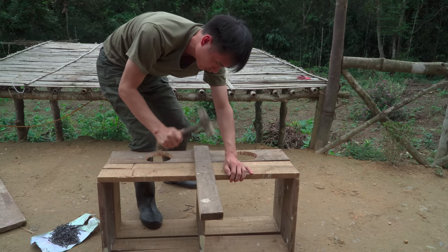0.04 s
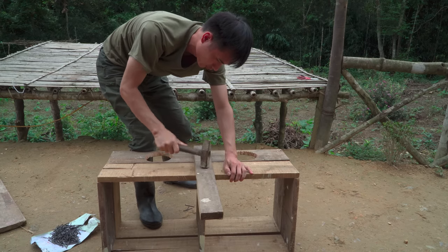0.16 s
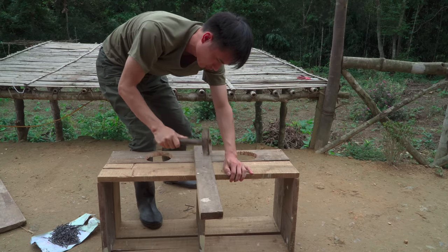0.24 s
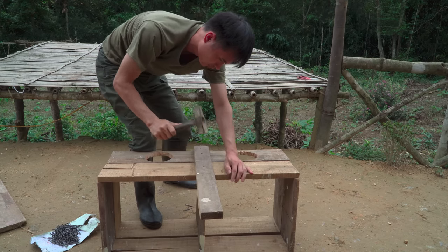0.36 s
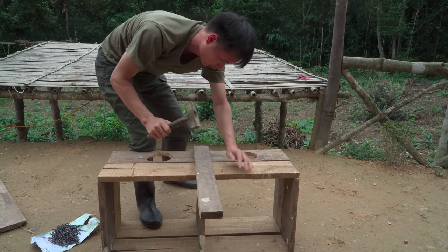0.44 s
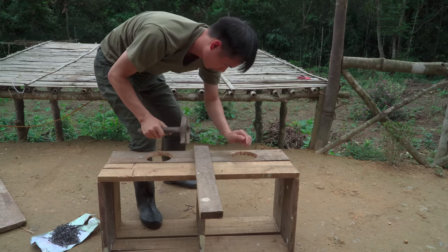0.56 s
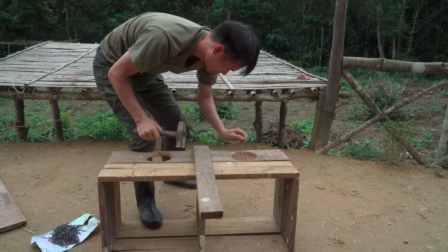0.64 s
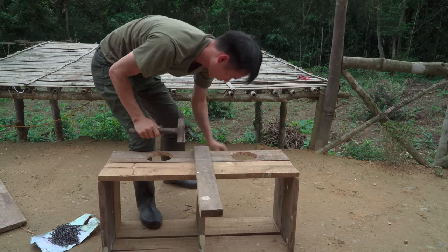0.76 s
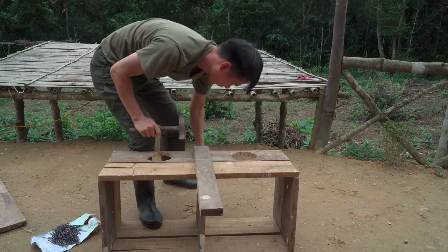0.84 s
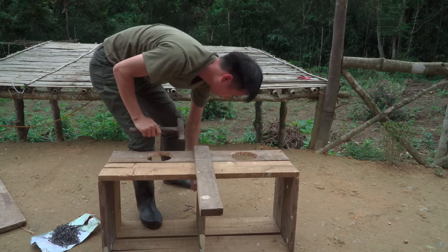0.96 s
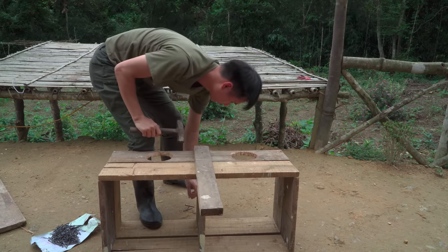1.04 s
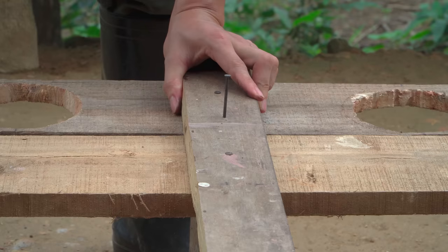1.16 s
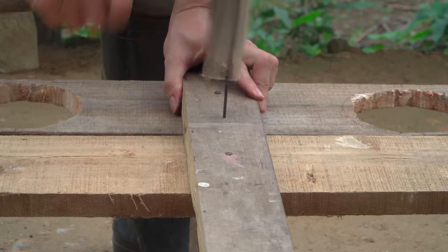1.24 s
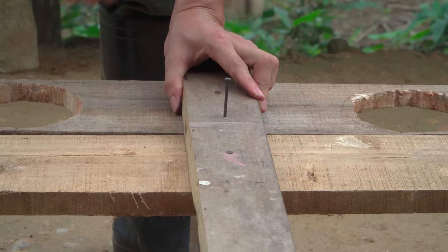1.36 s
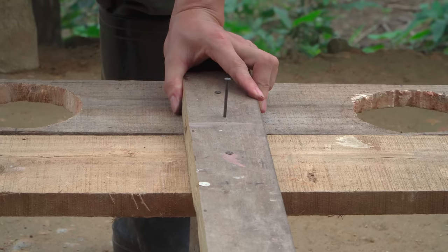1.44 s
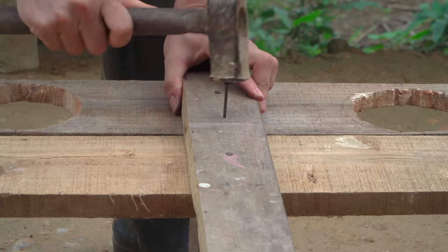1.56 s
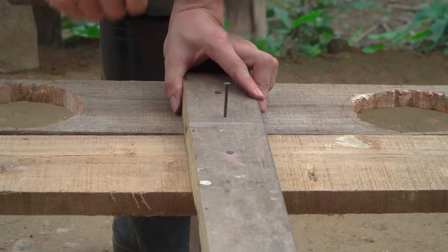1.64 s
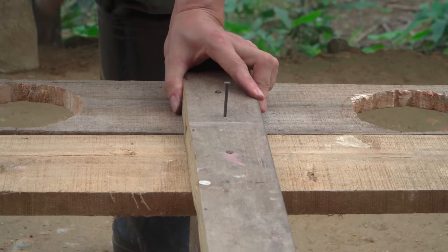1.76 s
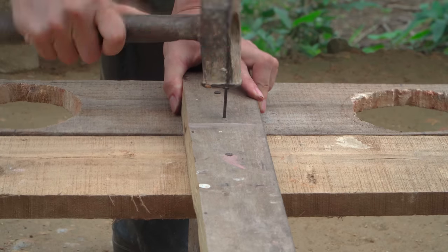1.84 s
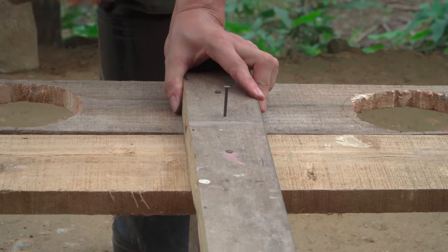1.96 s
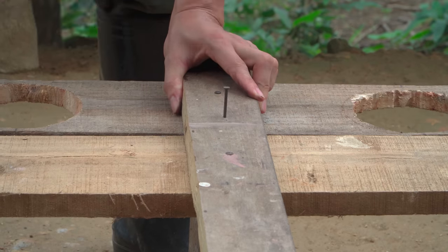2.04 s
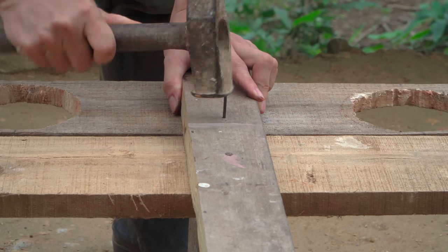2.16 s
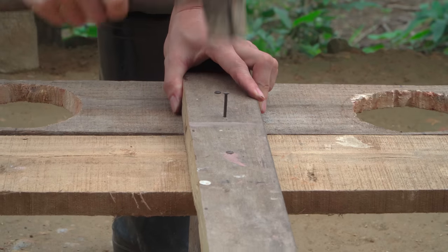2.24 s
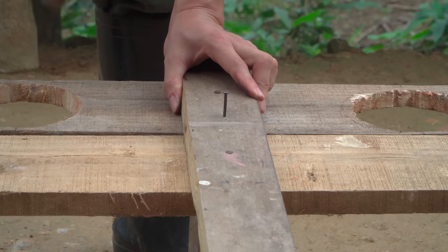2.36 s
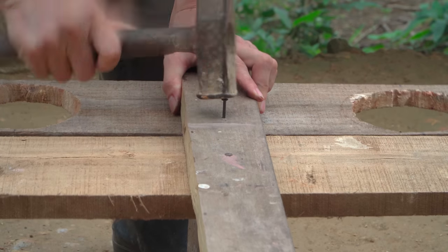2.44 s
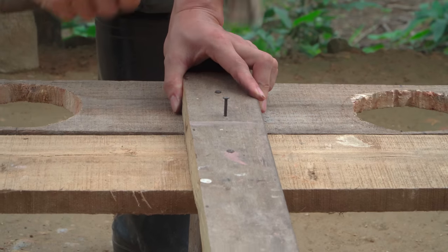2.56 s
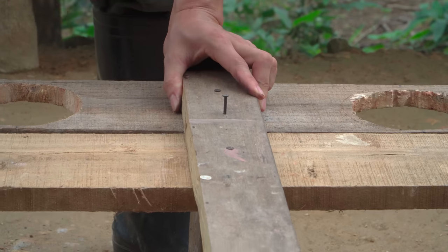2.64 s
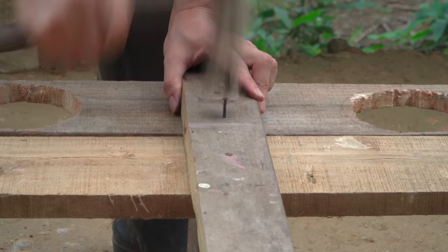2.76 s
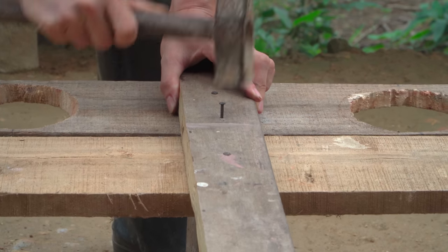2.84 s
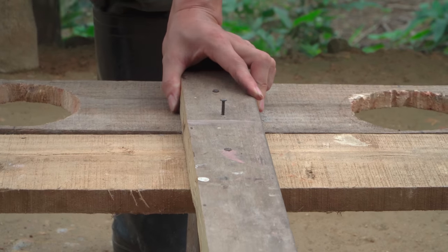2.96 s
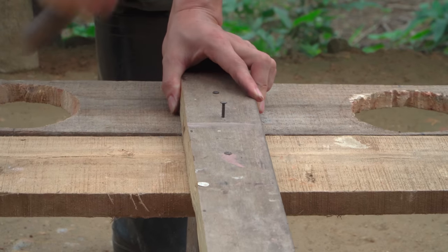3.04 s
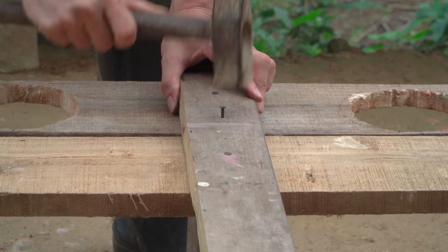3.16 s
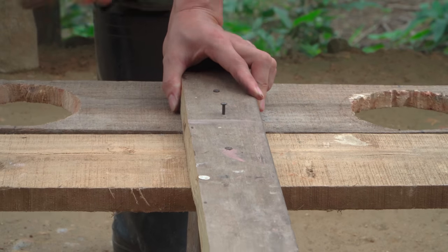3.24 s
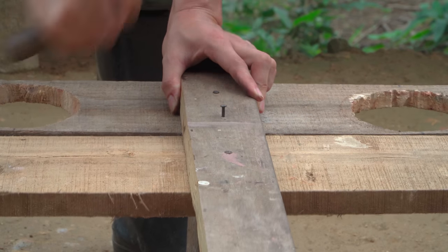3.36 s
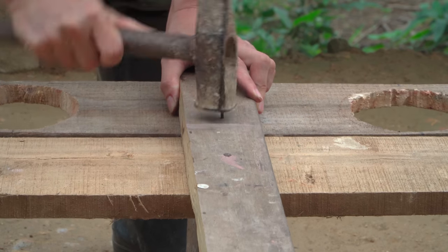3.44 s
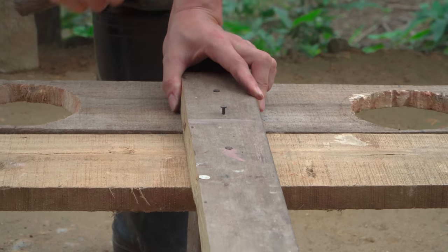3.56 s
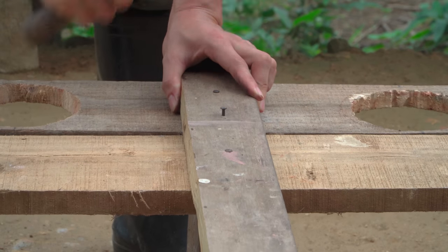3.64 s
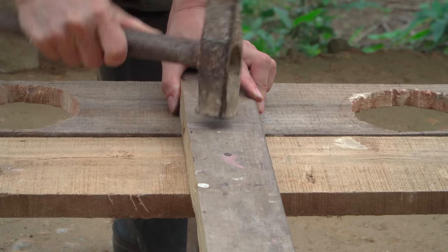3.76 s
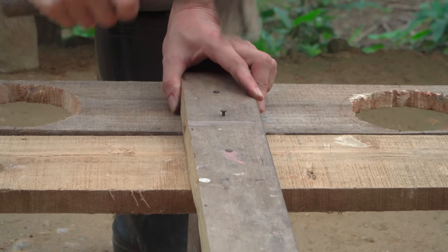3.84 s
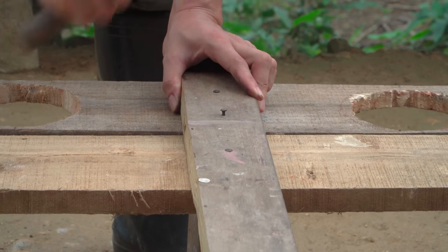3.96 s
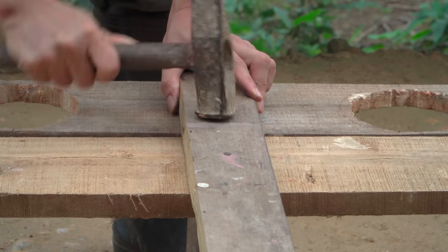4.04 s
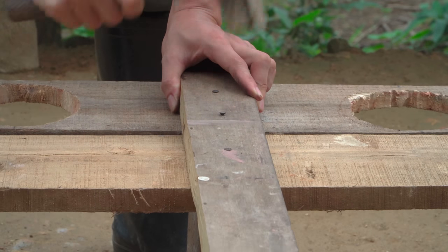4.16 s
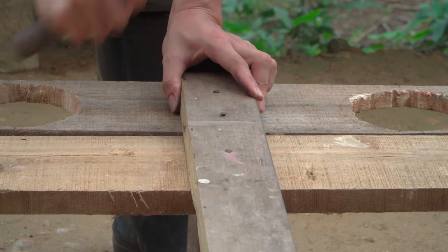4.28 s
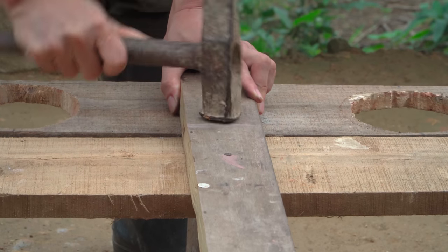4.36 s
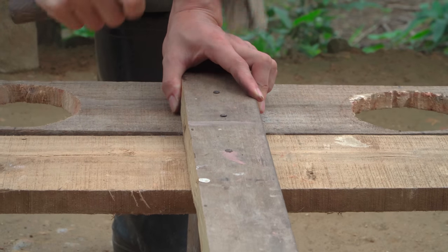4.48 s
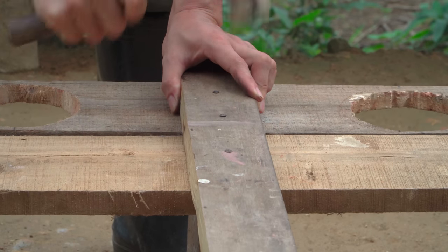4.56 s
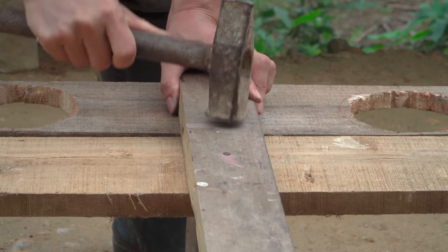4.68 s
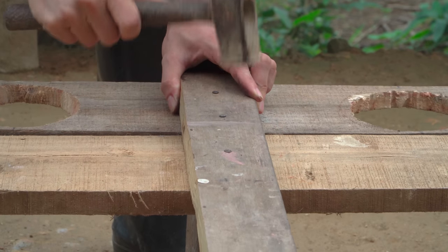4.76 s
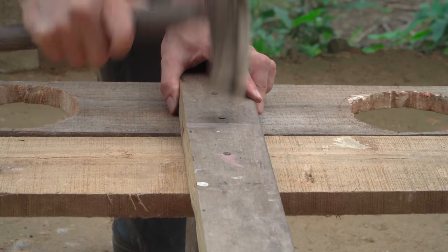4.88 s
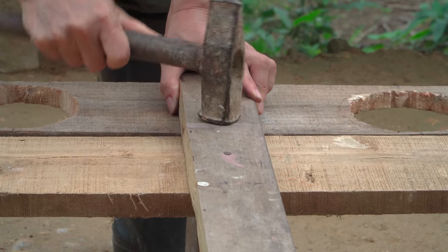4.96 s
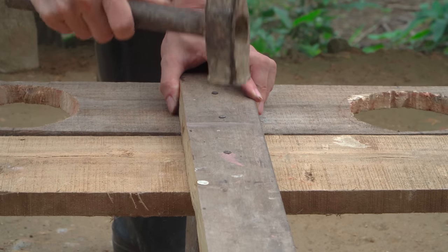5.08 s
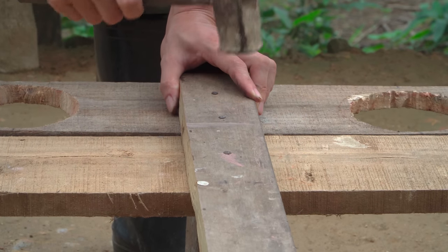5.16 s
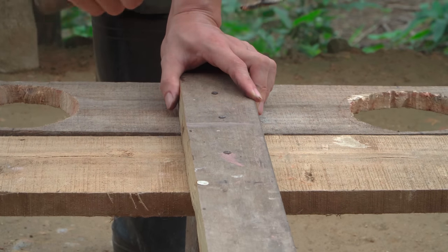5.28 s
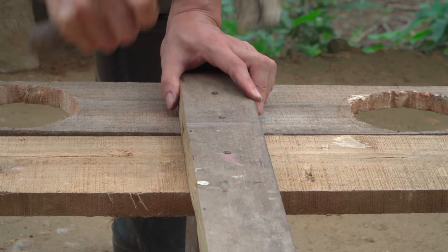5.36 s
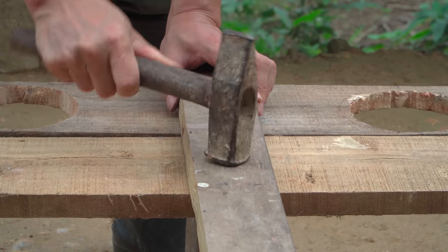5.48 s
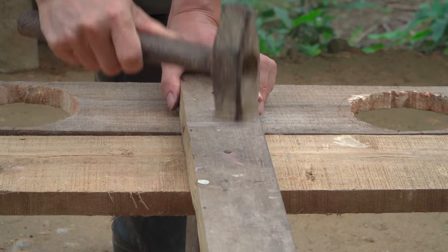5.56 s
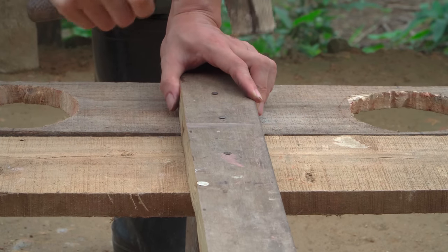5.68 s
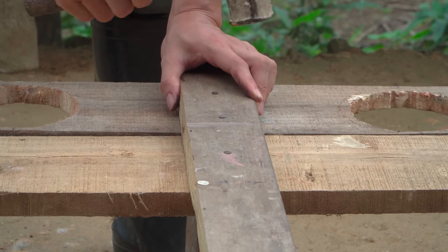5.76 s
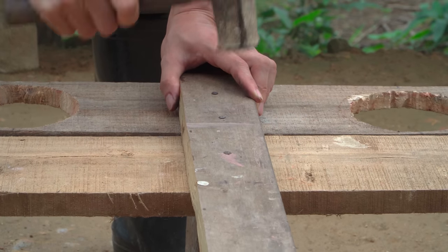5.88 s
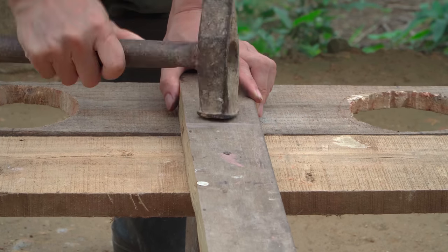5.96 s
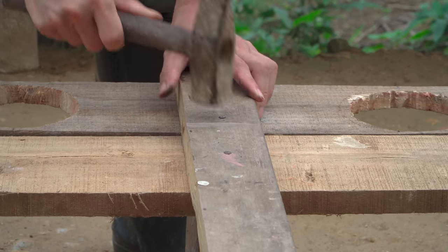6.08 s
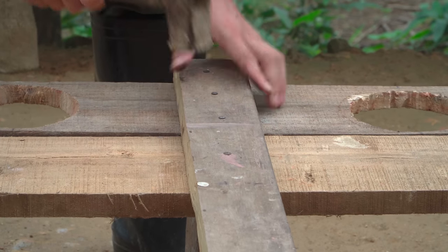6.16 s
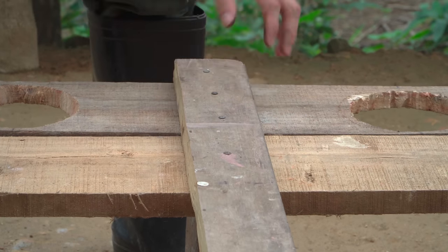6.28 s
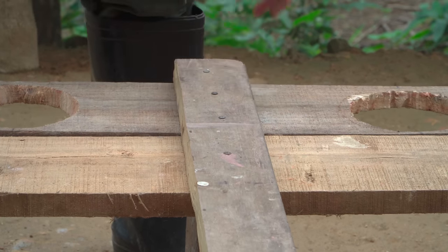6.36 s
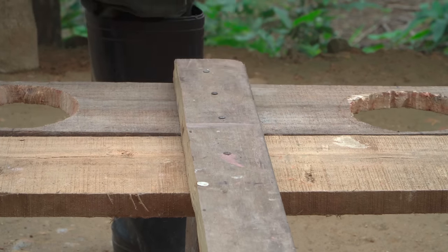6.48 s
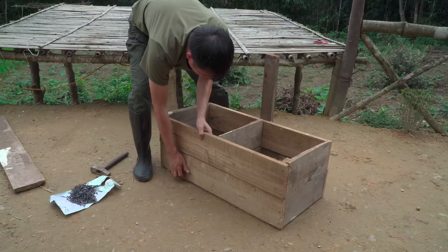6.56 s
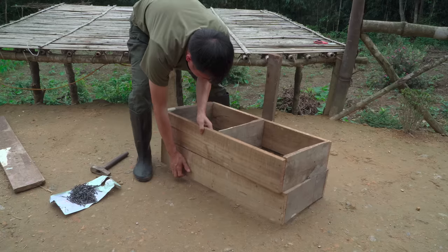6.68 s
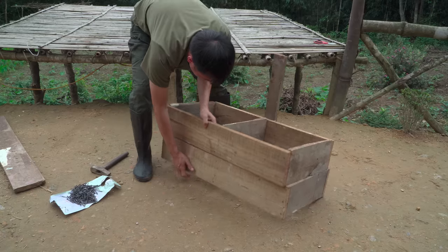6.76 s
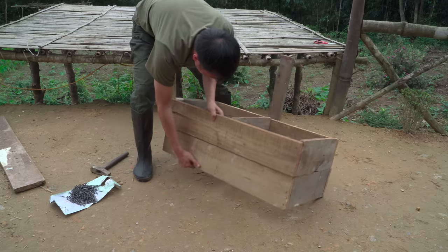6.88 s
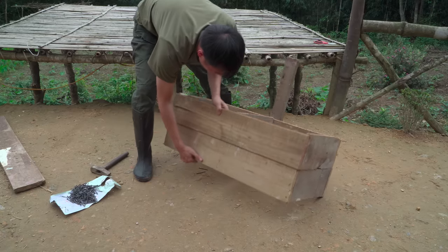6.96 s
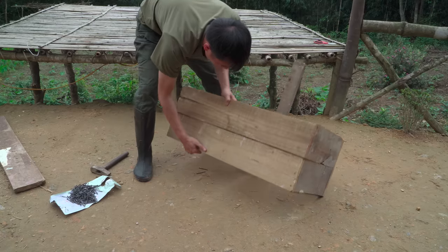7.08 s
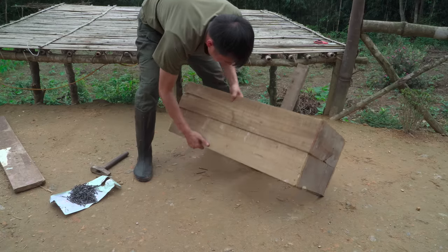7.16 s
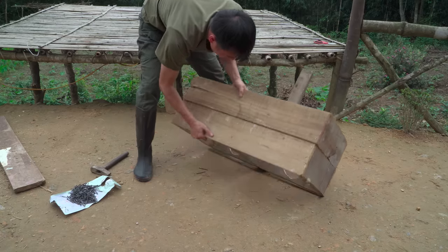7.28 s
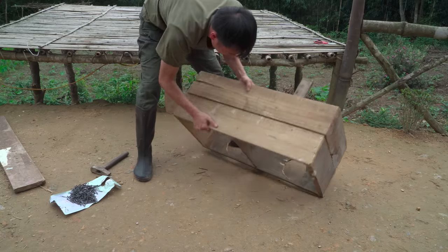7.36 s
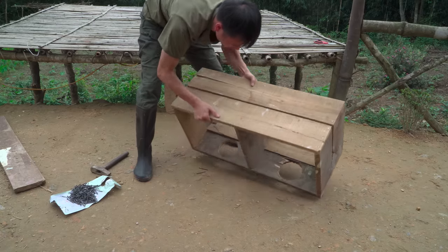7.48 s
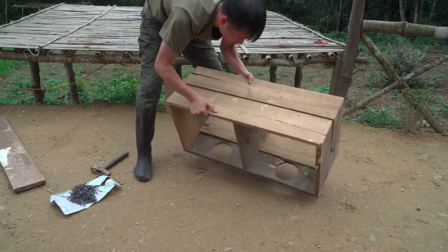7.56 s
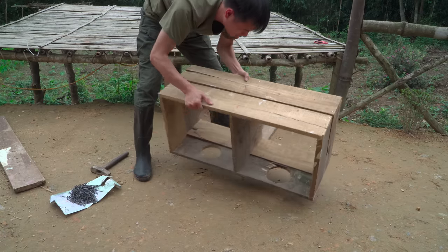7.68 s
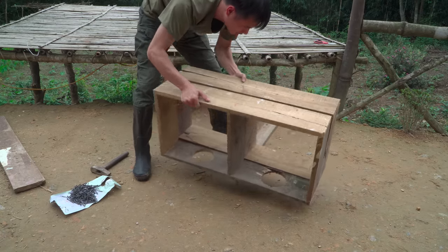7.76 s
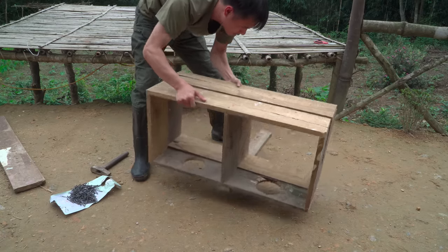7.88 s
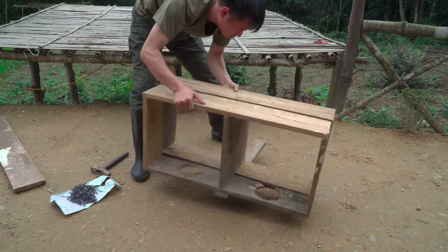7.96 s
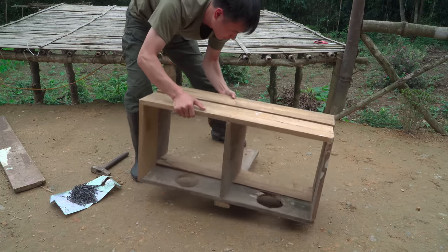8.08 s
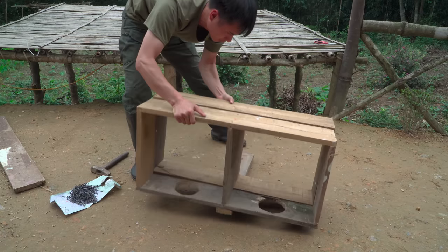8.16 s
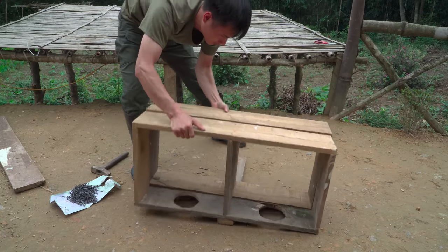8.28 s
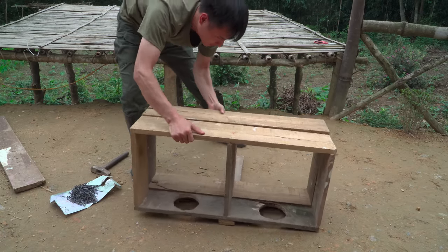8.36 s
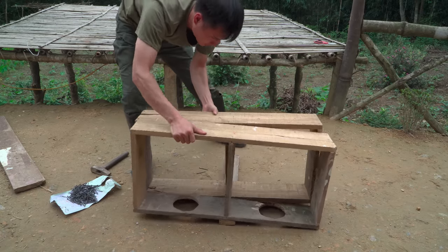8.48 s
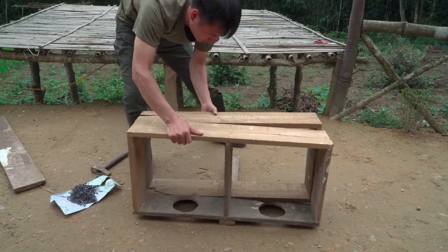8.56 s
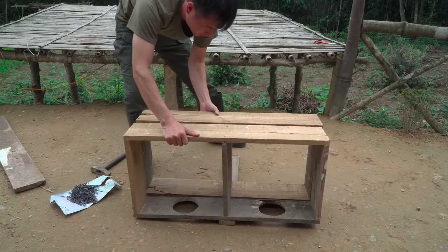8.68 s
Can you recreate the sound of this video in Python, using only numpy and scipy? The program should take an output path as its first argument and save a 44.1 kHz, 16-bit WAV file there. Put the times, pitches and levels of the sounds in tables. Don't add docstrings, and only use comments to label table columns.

```python
import sys
import numpy as np
from scipy import signal
from scipy.fft import rfft, irfft, next_fast_len
from scipy.io import wavfile
from scipy.ndimage import uniform_filter1d

SR = 44100
rng = np.random.default_rng(int(sys.argv[2]) if len(sys.argv) > 2 else 0)


def convert_level_to_amplitude(level_db):
    exponent = np.asarray(level_db, float) / 20
    return 10 ** exponent


def output_pcm(signal):
    pcm = np.clip(np.atleast_2d(signal).T, -1, 1) * 32767
    wavfile.write(sys.argv[1], SR, np.round(pcm).astype(np.int16))


N = 384993
LEAD = .2
PAD = round(LEAD * SR)
SCENE_CHANGE_S = 6.61


def evened(x):
    return x / np.sqrt(np.mean(x ** 2) + 1e-20)


def read(points, hz):
    f, value = np.transpose(points)
    return np.interp(np.log(hz + 1), np.log(f + 1), value)


def add(mix, s, sound):
    part = mix[..., round((s + LEAD) * SR):]
    n = min(part.shape[-1], sound.shape[-1])
    part[..., :n] += sound[..., :n]


def between(ends, home):
    return ends[0] + (ends[1] - ends[0]) * home


def duller(spectrum, loss_db):
    return [(hz, db - loss_db * max(np.log2(hz / 3000), 0)) for hz, db in spectrum]


def dying(t60, size):
    return convert_level_to_amplitude(-60 * np.arange(size) / SR / t60)


def rings(modes, t60, spread_db, detune):
    t = np.arange(round(t60 * SR)) / SR
    hz, db = np.transpose(modes)[:, :, None]
    u = rng.standard_normal((len(modes), 2))
    level = convert_level_to_amplitude(db + spread_db * u[:, :1] - 60 * t / t60)
    return (level * np.sin(2 * np.pi * hz * (1 + detune * u[:, 1:]) * t)).sum(0)


def shaken(modes, t60, force):
    ring = rings(modes, t60, 1.5, .008)
    ring = signal.sosfilt(signal.butter(4, .85 * modes[0][0], "high", fs=SR, output="sos"), ring)
    return signal.fftconvolve(force * rng.standard_normal(len(force)), ring / np.linalg.norm(ring))[:len(force)]


def burst(spectrum, t60, size=4096):
    z = rfft(rng.standard_normal(size)) * convert_level_to_amplitude(read(spectrum, np.fft.rfftfreq(size, 1 / SR)))
    return evened(irfft(z)) * dying(t60, size)


# pitch_hz, level_db
RING = [(510, -1.5), (575, -3.5), (650, -8), (710, -3), (860, -2.5), (900, -2), (1000, -4.5), (1050, -4.5),
        (1145, -3)]
KNOCK = [(1260, -53), (1380, -40), (1505, 14), (1590, 6.5), (1820, -25), (1995, 8.5), (2320, 4),
         (2600, -47), (2850, 8), (3380, 1), (4050, -2), (4700, -37)]
BOOM_T60, RING_T60, KNOCK_T60 = .16, .09, .03


def thump(db, box):
    force = dying(.025, 8192)
    boards = 1.34 * shaken(RING, 0.063, force) + 0.71 * shaken(KNOCK, KNOCK_T60, force)
    return convert_level_to_amplitude(db - 5.5) * (shaken(box, BOOM_T60, force) + boards)


# pitch_hz, level_db
BOOM = [(160, -9.5), (225, -80), (257, 8.5), (305, 10), (347, 6.5), (410, 0.5), (455, -43)]
# pitch_hz, level_db
BATTEN = [(770, -10.5), (803, -2.5)]
# pitch_hz, level_db per Hz
RATTLE = [(1500, 35), (4000, -12), (8000, -23), (16000, -2)]


def crate_jump(boom_db, ring_db, knock_db, lands, thump_db, loss_db, batten_db, deep_db, crack_db):
    size = 16384
    t = np.arange(size) / SR

    def landing(rise, t60):
        return np.where(t < lands, np.exp(-((t - lands) / rise) ** 2), convert_level_to_amplitude(-60 * (t - lands) / t60))

    chatter = convert_level_to_amplitude(4.5 * evened(uniform_filter1d(rng.standard_normal(size), 120)) - 2.5)
    box = [(hz, db + deep_db * (hz < 240)) for hz, db in BOOM]
    wood = convert_level_to_amplitude(boom_db - 18.0) * shaken(box, BOOM_T60, 1.47 * dying(0.036, size) + landing(0.014, 0.27))
    force = chatter * (2.0 * dying(0.027, size) + landing(0.042, 0.21))
    wood += convert_level_to_amplitude(ring_db - 19.5) * shaken(RING, RING_T60, force)
    force = 1.36 * dying(0.081, size) + landing(0.029, 0.16)
    wood += convert_level_to_amplitude(batten_db + 6) * shaken(BATTEN, RING_T60, force)
    force = chatter * (6.4 * dying(0.17, size) + landing(0.014, 0.045))
    wood += convert_level_to_amplitude(knock_db - 30.0) * shaken(KNOCK, KNOCK_T60, force)
    wood += convert_level_to_amplitude(crack_db - 40.5) * chatter * burst(duller(RATTLE, loss_db), 0.64, size)
    add(wood, lands - LEAD, thump(thump_db, box))
    return wood


# pitch_hz, level_db per Hz
CRACK = [(120, -113), (260, -7.5), (2290, 4.5), (2800, 6), (3620, 0.5), (4270, 2), (5940, -12.5),
         (8420, -18.5), (16000, -44)]


def steel_crack(crack_db, pitch, loss_db):
    colour = duller([(hz * pitch if hz > 1000 else hz, db) for hz, db in CRACK], loss_db)
    crack, skew = burst(colour, 0.015), burst(colour, 0.0093)
    fizz = convert_level_to_amplitude(-21) * burst(colour, 0.086)
    return convert_level_to_amplitude(crack_db + 7.5) * (crack + 0.11 * skew * [[1], [-1]] + fizz)


# pitch_hz, level_db per Hz
THROWN = [(88, -56), (150, -106), (259, -2), (406, -9), (475, -43), (514, -17), (689, -4), (854, -6),
          (1980, -5), (6390, -21.5), (16000, -47.5)]


def report(strength_db, peak_hz, peak_db, loss_db):
    hz = np.fft.rfftfreq(1024, 1 / SR)
    colour_db = read(duller(THROWN, loss_db), hz) + peak_db * np.exp(-((hz - peak_hz) / 250) ** 2)
    for (mode_hz, _), u in zip(RING + KNOCK, rng.standard_normal(len(RING + KNOCK))):
        colour_db += (3.5 + 2.5 * u) * np.exp(-((hz / mode_hz - 1) / .035) ** 2)
    pulse = np.fft.fftshift(irfft(convert_level_to_amplitude(colour_db)))[256:]
    return convert_level_to_amplitude(strength_db + 19.5) * pulse / np.linalg.norm(pulse)


# start_s, strength_db, nail_home (0-1), board_ring_db, strongest_knock_hz
BLOWS = [(-.11, -3, 0, -5, 2210), (0.1831, 1.5, 0.44, 8, 1680), (1.3315, -5, 0.3, 3.5, 1500),
         (1.6319, -4, 0.27, 5, 1510), (1.9181, -4, 0.23, 5.5, 1460), (2.2238, -3.5, 0.15, 5.2, 1540),
         (2.5237, -4, 0.3, 2, 2300), (2.8563, -4.5, 0.05, 2, 2800), (3.1655, -2.5, 0.29, 2.5, 1480),
         (3.4695, -1.2, 0.24, 0.5, 2010), (3.7769, -1.2, 0.4, 4, 2510), (4.0902, 0.5, 0.13, 0, 2300),
         (4.4033, 1, 0.36, 2.5, 2180), (4.6838, -1, 0.63, 5, 1920), (4.986, -1.4, 0.62, 8.5, 1440),
         (5.5098, 2.5, 1, 5.5, 1560), (6.0293, 2, 0.73, 3.5, 1480)]
# start_s, thump_db, boom_db, batten_db, extra_chatter_db
LANDINGS = [(-.083, -4, 2.5, -11, 1), (0.212, -11, 3, -23.5, 3), (1.371, -2, -3, -28, 2.5),
            (1.656, -9, 2.8, -30, 0), (1.95, -0.5, -0.5, -23, 4), (2.253, -4.5, 1.5, -26, 2.5),
            (2.549, -3, 3.5, -23, 8), (2.892, -33, 4.5, -23.5, 1.5), (3.206, -2, 3.7, -17.5, 0),
            (3.51, -1.5, 7, -18.5, 2.5), (3.814, -2, 4.5, -29, 2), (4.127, -8, 5.5, -19.5, 3),
            (4.443, -2.5, 5, -21.5, -1.5), (4.715, -1.5, 3, -16.5, 0.5), (5.022, -5, 5.5, -14.5, 1.5),
            (5.552, -2, 2.5, -28, -3), (6.083, -6.5, -1.5, -15, 1)]
CRACK_DB, KNOCK_DB, DULL_DB_PER_OCTAVE = (-1.4, -1.4), (1.5, -4), (-8.5, -1)
CRACK_PITCH, DEEP_DB = (1.103, 0.83), (1, -8)


def hammer_blows():
    near, thrown = np.zeros((2, N + PAD)), np.zeros((3, N + PAD))
    for k, (strike, landing) in enumerate(zip(BLOWS, LANDINGS)):
        s, db, home, ring_db, note_hz = strike
        lands, thump_db, boom_db, batten_db, chatter_db = landing
        crack_db = between(CRACK_DB, home) + .1 * db
        loss_db = between(DULL_DB_PER_OCTAVE, home)
        knock_db = between(KNOCK_DB, home) + chatter_db
        deep_db = between(DEEP_DB, home)
        wood = crate_jump(boom_db, ring_db, knock_db, lands - s, thump_db, loss_db, batten_db, deep_db, crack_db)
        add(near, s, np.array([wood, wood]))
        add(near, s, steel_crack(crack_db, between(CRACK_PITCH, home), loss_db))
        note_db = -0.2 + 8 * np.log2(note_hz / 1650)
        add(thrown[k % 3], s, report(db, note_hz, note_db, loss_db))
    return near, thrown


# pitch_hz, level_db
STEEL = [(4700, -3), (6100, 2), (9000, -10), (9800, -2)]


def steel_ring():
    out, force = np.zeros(N + PAD), dying(0.17, 8192)
    for s, _, home, *_ in BLOWS:
        add(out, s, convert_level_to_amplitude(between((-25, -46), home)) * shaken(STEEL, 0.047, force))
    return out[PAD:]


# pitch_hz, level_db
HOLLOW = [(250, -19), (288, 16.5), (330, 0.5), (400, -43)]
SLATS = [(545, 5), (730, 8), (800, 5), (1020, -1.5), (1400, -1)]
HOLLOW_T60, SLATS_T60, TAP_T60 = .17, .06, .1


def tap(peak_db, tick_db, ring_db, contact):
    force = dying(contact, 8192)
    sound = convert_level_to_amplitude(2.5) * shaken(HOLLOW, TAP_T60, force) + convert_level_to_amplitude(ring_db + 3.0) * shaken(SLATS, SLATS_T60, force)
    grit = [(150, -40), (500, 11.5), (3000, -4.5), (9000, -13), (14000, -25)]  # Hz, dB per Hz
    sound[:4096] += convert_level_to_amplitude(tick_db - 4.5) * burst(grit, contact)
    return convert_level_to_amplitude(peak_db - 8.0) * sound


def bump(db, contact):
    rise = np.minimum(np.arange(8192) / SR / 0.0033, 1)
    force = rise * dying(contact, 8192)
    return convert_level_to_amplitude(db) * (shaken(SLATS[1:3], SLATS_T60, force) + convert_level_to_amplitude(-7) * shaken(HOLLOW, TAP_T60, force))


def drag(start, length, peak_db, slats_db, grit_db):
    t = np.arange(0, length, 1 / SR)
    level_db = peak_db - 7.5 * np.interp(t / length, [0, 0.47, 1], [1, 0, 1])
    slips = evened(convert_level_to_amplitude(1.5 * rng.exponential(1, len(t))) * (rng.random(len(t)) < 9000 / SR))
    grit = shaken([(1400, 14.0), (2200, 12.0), (2800, 4.5), (3400, 2.0), (5000, -2.0)], 0.005, slips)
    sound = shaken(HOLLOW, HOLLOW_T60, slips) + convert_level_to_amplitude(slats_db) * shaken(SLATS, SLATS_T60, slips)
    sound += convert_level_to_amplitude(grit_db) * grit
    return start, convert_level_to_amplitude(level_db) * sound * signal.windows.tukey(len(t), .15)


def jolt(s, db, hz):
    u = np.arange(-1.2, 1.2, hz / SR)
    return s - 1.2 / hz, convert_level_to_amplitude(db) * np.cos(2 * np.pi * u) * np.exp(-(u / .55) ** 2)


# start_s, peak_db, tick_db, board_ring_db (against boom), contact_s
TAPS = [(1.115, -28, 19.5, -3, 0.019), (6.706, -24, -2, 2.5, 0.05), (6.901, -31, -4, -15, 0.03),
        (7.0, -20, -3, -12, 0.037), (8.403, 0, -23, 4, 0.051), (8.42, -4, -30, -0.5, 0.034),
        (8.434, 2.5, -9.5, -10, 0.047), (8.547, -7.5, 0.5, -9.5, 0.16)]
# start_s, level_db, contact_s
BUMPS = [(7.224, -23, 0.068), (7.245, -25, 0.035), (7.266, -19, 0.068), (7.401, -29, 0.093),
         (7.429, -30, 0.046)]
# centre_s, peak_db, pitch_hz
JOLTS = [
    (1.476, -17.5, 48.6),
    (1.606, -24, 51),
    (2.503, -29, 61),
    (8.414, -11.5, 139),
    (8.44, -22, 130),
]
# start_s, length_s, peak_db, slats_db, grit_db
DRAGS = [(6.616, .1, -33.5, -8, -14), (6.699, 0.11, -29, -0.5, -10), (6.795, 0.071, -29, -4.5, -26),
         (6.842, 0.12, -32.5, -4.5, -7), (6.95, 0.094, -27.5, -9.5, -7), (7.066, 0.16, -45, 1, -10),
         (7.26, 0.063, -35, -13, -19), (8.353, 0.049, -34.5, 2, 4), (8.463, 0.083, -23, -13, -9),
         (8.628, 0.071, -28.5, -0.5, -1), (8.668, 0.11, -24, -3, -3)]


def crate_handling():
    out = np.zeros(N + PAD)
    for s, *row in TAPS:
        add(out, s - .001, tap(*row))
    for s, *row in BUMPS:
        add(out, s, bump(*row))
    for row in JOLTS:
        add(out, *jolt(*row))
    for row in DRAGS:
        add(out, *drag(*row))
    return out


# pitch_hz, level_db per Hz
SOIL = [(20, -18), (45, 0.5), (62, 2.5), (105, -3), (140, -46)]
# start_s, level_db, time_to_peak_s
DROP_SHUDDERS = [
    (8.38, -27, 0.032),
    (8.45, -42, 0.11),
]


def rumble():
    t = np.arange(0, N / SR, .002)
    power = convert_level_to_amplitude(np.where(t < SCENE_CHANGE_S, -60, -51.5)) ** 2
    swells = [(s, between((-31, -41), home), 0.065) for s, _, home, *_ in BLOWS]
    for s, db, peak_s in swells + DROP_SHUDDERS:
        u = np.maximum(t - s, 0) / peak_s
        power = power + (convert_level_to_amplitude(db) * (u * np.exp(1 - u)) ** 0.89) ** 2
    z = rfft(rng.standard_normal(N)) * convert_level_to_amplitude(read(SOIL, np.fft.rfftfreq(N, 1 / SR)))
    return np.interp(np.arange(N) / SR, t, np.sqrt(power)) * evened(irfft(z, N))


# pitch_hz, phase_radians
PORTS = [(0, 0.28), (1120, -0.51), (4310, -0.36), (5770, -1.1), (8870, -0.73), (15800, -0.2)]


def ports(x):
    size = next_fast_len(x.shape[1])
    turn = np.exp(.5j * read(PORTS, np.fft.rfftfreq(size, 1 / SR)) * [[1], [-1]])
    return irfft(rfft(x, size) * turn, size)[:, :x.shape[1]]


def pair(frames, hz, same):
    a, b, c, d = rng.standard_normal((frames, len(hz), 4)).T
    same = np.clip(read(same, hz), -1, 1)[:, None]
    mid = np.sqrt((1 + same) / 2) * (a + 1j * b)
    side = np.sqrt((1 - same) / 2) * (c + 1j * d)
    return np.array([mid + side, mid - side])


# delay_s, level_db, treble_loss_db per octave
YARD = [(.006, -14.5, 0.5), (.04, -16, 1), (.1, -23, 0.73), (.135, -23, -0.06), (.19, -32.5, -1.8),
        (.27, -42, 0), (.34, -33, 3.5), (.45, -41, 0.5), (.6, -46, 6), (.85, -75, 5.5)]
# pitch_hz, likeness (0-1)
ECHO_SAME = [(100, 1), (500, 0.83), (1500, 0.49), (5000, 0.1)]


def echoes(x):
    hz = np.fft.rfftfreq(256, 1 / SR)
    s, db, loss_db = np.transpose(YARD)
    t = np.arange(SR // 64 + 4) * 64 / SR
    octaves = np.log2(np.maximum(hz, 900) / 900)[:, None]
    level_db = np.interp(t, s, db, left=-90, right=-120) - np.interp(t, s, loss_db) * octaves
    z = pair(len(t), hz, ECHO_SAME) * convert_level_to_amplitude(level_db)
    returns = 0.011 * signal.istft(z, nperseg=256, noverlap=192)[1]
    return signal.fftconvolve(x[None], returns, axes=1)[:, :len(x)]


def whistle(rows):
    s, hz = np.transpose(rows)
    t = np.arange(s[0], s[-1], 1 / SR)
    glide = uniform_filter1d(np.interp(t, s, hz), 300)
    level = convert_level_to_amplitude(3.5 * (glide - glide.mean()) / 1000) * signal.windows.tukey(len(t), 0.29)
    return s[0], level * np.sin(2 * np.pi * np.cumsum(glide) / SR)


# start_s, pitch_hz
BIRDS = [
    [(.43, 7300), (.442, 7950), (.47, 7550), (.495, 7400), (.52, 6850), (.535, 6400)],
    [(0.73, 7883), (0.756, 7452), (0.786, 6388), (0.8, 6175)],
    [(5.69, 5700), (5.724, 6670), (5.765, 6870), (5.8, 7350), (5.813, 8100), (5.83, 8500)],
    [(7.255, 6100), (7.29, 6200), (7.33, 6170)],
    [(7.98, 5800), (8.02, 5830), (8.045, 6060)],
    [(8.65, 5695), (8.686, 6524), (8.706, 6726), (8.74, 7100)],
]
# straight_db, by_trees_db
BIRD_PATHS = [(-35, -42), (-47, -38), (-27.5, -27), (-52, -50), (-47, -42), (-32, -25)]


def bird_whistles():
    out = np.zeros((2, N + PAD))
    for rows, paths_db in zip(BIRDS, BIRD_PATHS):
        s, sound = whistle(rows)
        add(out, s, convert_level_to_amplitude(np.array(paths_db) + 1)[:, None] * sound)
    return out


# pitch_hz, level_db per Hz
AIR = [
    [(15, -41), (25, -10), (176, -15), (264, -12.5), (429, -11.5), (518, -9.5), (562, -8), (1850, -16),
     (2930, -14), (3180, -13), (7770, -25), (13500, -33), (14100, -26.5)],
    [(15, -33), (25, -6.5), (256, -1), (327, 1.5), (385, -5), (547, 2.5), (867, -2), (2010, -4.5),
     (2630, -1.5), (5930, -9.5), (6790, -13.5), (13600, -20), (14100, -15)],
]
AIR_DB = [-40.5, -37]
# pitch_hz, likeness (0-1)
SAME = [(60, 0.94), (180, 0.73), (550, 0.64), (1650, 0.39), (4970, 0.042), (15000, 0.25)]


def air():
    frames, hz = N // 256 + 5, np.fft.rfftfreq(1024, 1 / SR)
    patches = uniform_filter1d(rng.standard_normal((frames, 513)).T, 12, 0)
    patches = evened(uniform_filter1d(patches, 14, 1))
    z = pair(frames, hz, SAME) * convert_level_to_amplitude(1.1 * patches)
    views = []
    for colour, db in zip(AIR, AIR_DB):
        hiss = signal.istft(z * convert_level_to_amplitude(read(colour, hz))[:, None], nperseg=1024, noverlap=768)[1][:, :N]
        views.append(convert_level_to_amplitude(db) * evened(hiss))
    return np.where(np.arange(N) < SCENE_CHANGE_S * SR, *views)


def scene():
    near, thrown = hammer_blows()
    crate = crate_handling()
    straight, by_trees = bird_whistles()
    mix = ports(near * convert_level_to_amplitude([[.2], [-.2]])) + sum(echoes(x) for x in thrown)
    mix += ports(crate * convert_level_to_amplitude([[-.8], [.8]])) + convert_level_to_amplitude(-11) * echoes(crate)
    mix += straight * convert_level_to_amplitude([[.5], [-.5]]) + convert_level_to_amplitude(-1.5) * echoes(by_trees)
    return mix[:, PAD:] + air() + rumble() + steel_ring()


def band_limit(x):
    return signal.sosfilt(signal.butter(12, 15745, fs=SR, output="sos"), x)


def record(dry):
    mix = np.clip(dry, -1, 1)
    return band_limit(mix)


dry = scene()
out = record(dry)
output_pcm(out)
```